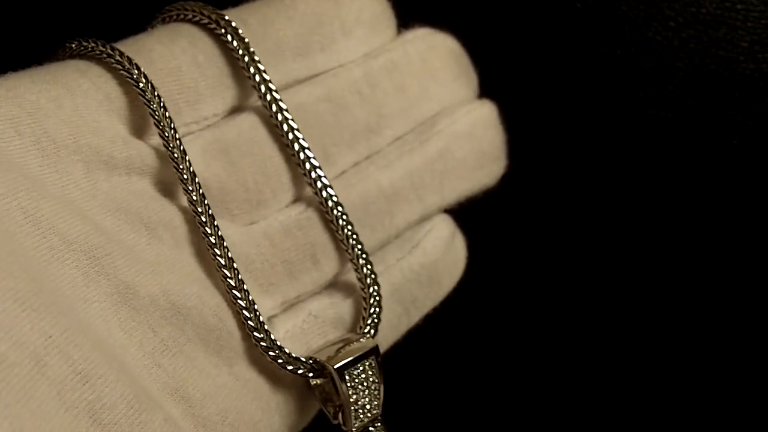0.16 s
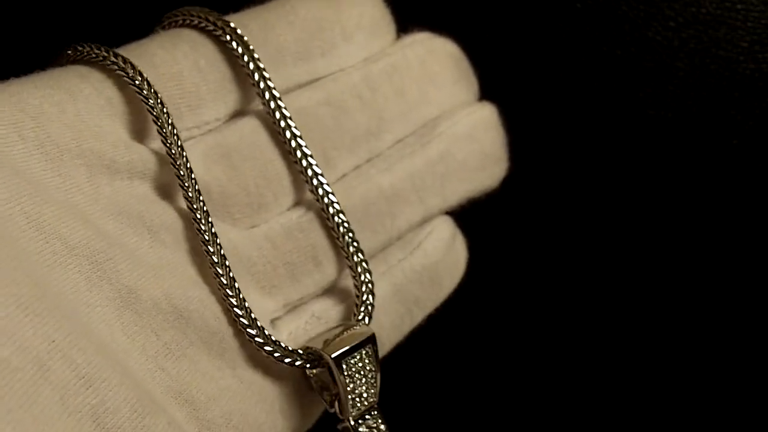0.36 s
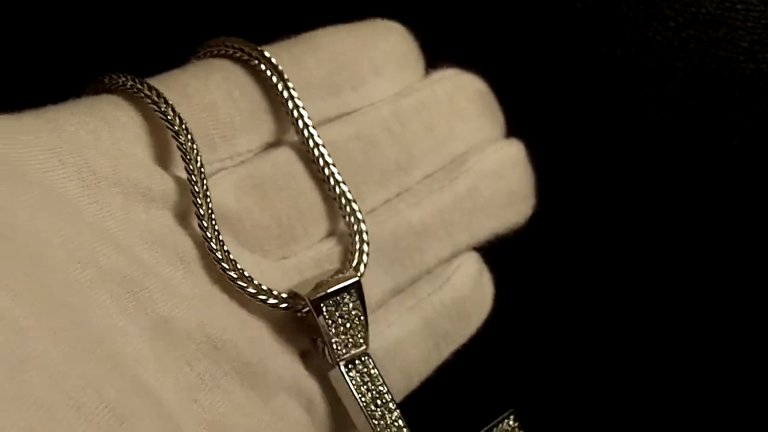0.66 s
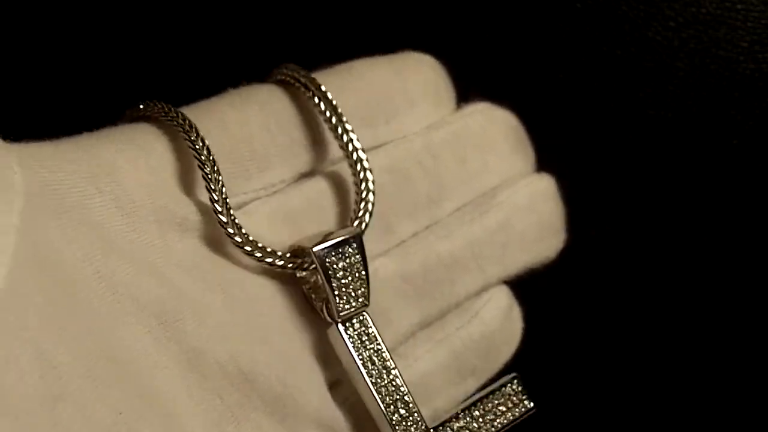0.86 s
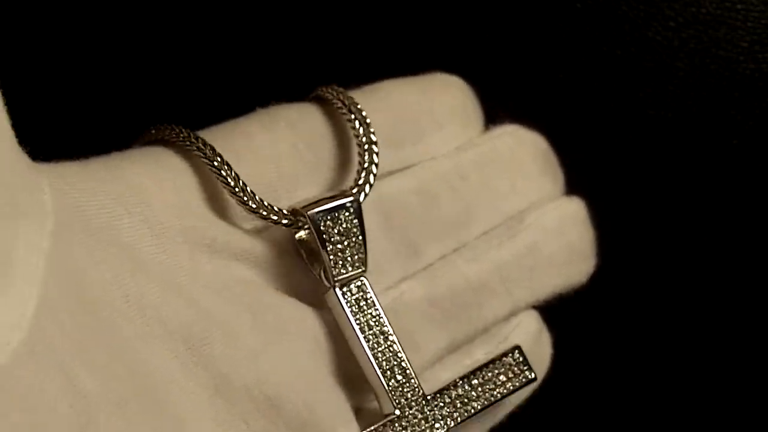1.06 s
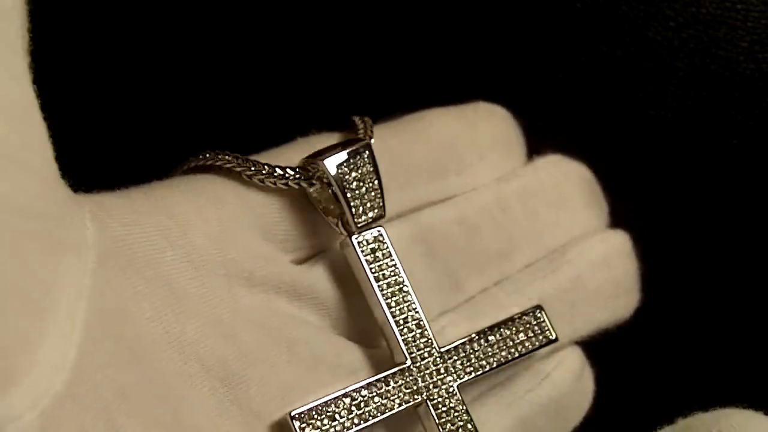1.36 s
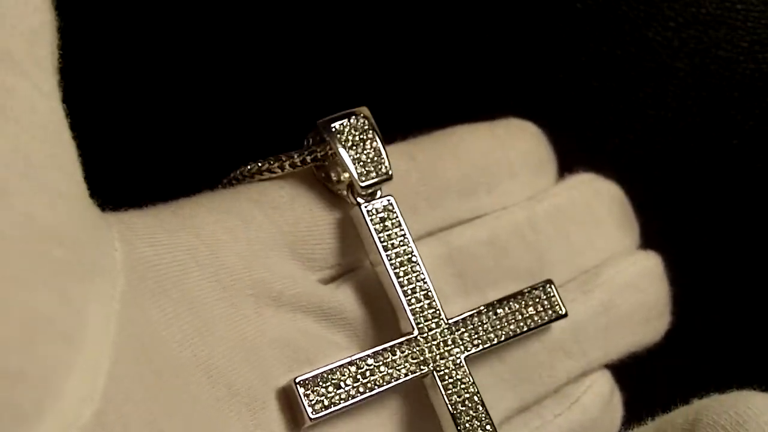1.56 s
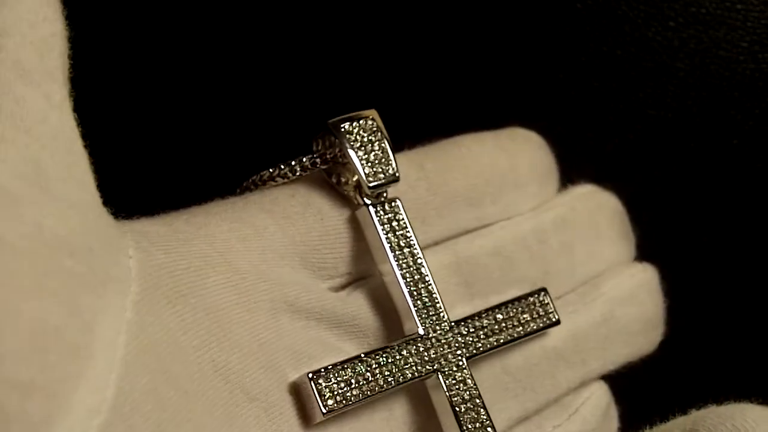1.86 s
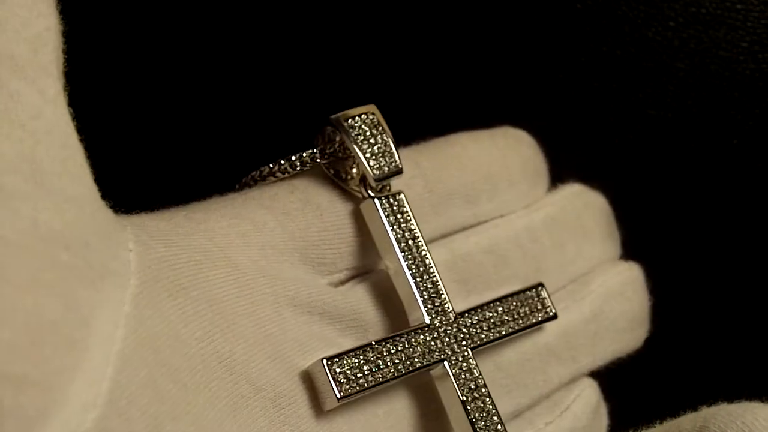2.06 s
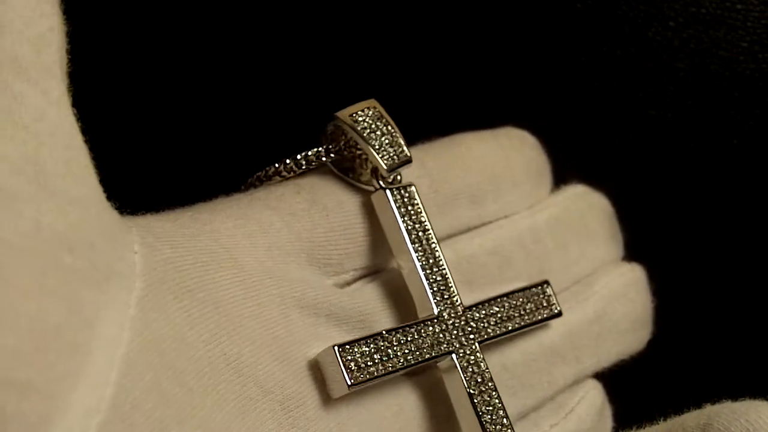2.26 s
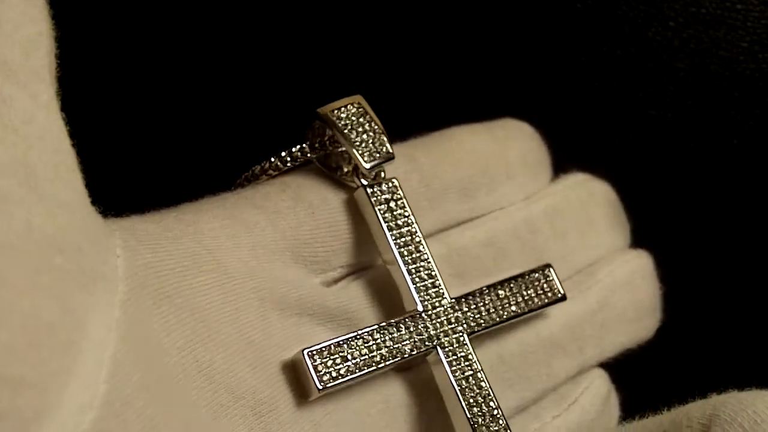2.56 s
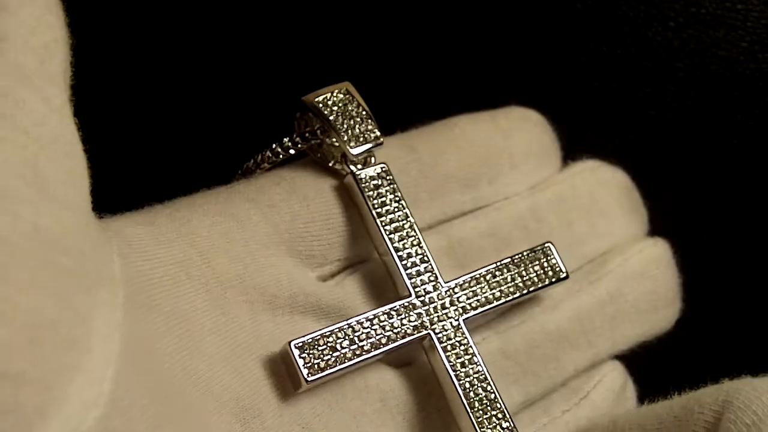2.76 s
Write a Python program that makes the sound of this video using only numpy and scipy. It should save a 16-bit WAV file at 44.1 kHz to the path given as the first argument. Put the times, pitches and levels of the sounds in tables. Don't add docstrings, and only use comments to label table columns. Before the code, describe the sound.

Small bright metal ticks and scraping of a necklace chain and cross, close up in a quiet room

```python
import sys
import numpy as np
from scipy import signal
from scipy.fft import rfft, irfft
from scipy.io import wavfile
from scipy.ndimage import uniform_filter1d

SR = 44100
rng = np.random.default_rng(int(sys.argv[2]) if len(sys.argv) > 2 else 0)


def log_audio(samples):
    frames = np.atleast_2d(samples).T
    limited = np.clip(frames, -1, 1)
    pcm = np.round(limited * 32767).astype(np.int16)
    wavfile.write(sys.argv[1], SR, pcm)


def level_to_linear(level):
    exponent = np.asarray(level, float) / 20
    return 10 ** exponent


N = 128331

# [f/Hz, level/dB, t60/s]
LINK_MODES = [(2277, -14, 0.021), (2540, -8.5, 0.0089), (3440, -46, 0.0056), (4330, -8, 0.018),
              (4760, -7, 0.0081), (5950, -12, 0.031), (6600, -7.5, 0.017), (6946, -6.5, 0.01),
              (7640, -5, 0.012), (8350, -20, .009), (8300, -11, 0.012), (8950, -17, 0.018),
              (9700, -36, 0.014), (9930, -19, 0.025)]
SPECK_FROM_HZ = 12900


def level(x, db):
    return x * level_to_linear(db) / np.sqrt(np.mean(x ** 2))


def noise(points):
    hz, db = np.array(points, float).T
    f = np.fft.rfftfreq(N, 1 / SR) + 1
    colour_db = np.interp(np.log(f), np.log(hz), db, left=-120, right=-120)
    return irfft(rfft(rng.standard_normal(N)) * level_to_linear(colour_db), N)


def walk(rate):
    k = int(SR / rate)
    steps = np.repeat(rng.standard_normal(N // k + 1), k)
    drift = uniform_filter1d(uniform_filter1d(steps, k), k)[:N]
    return drift / drift.std()


def band(x, hz, wide_hz):
    lo = max(np.hypot(hz, wide_hz / 2) - wide_hz / 2, 50)
    return signal.sosfilt(signal.butter(2, [lo, lo + wide_hz], "band", fs=SR, output="sos"), x)


def tone(hz, db):
    return level_to_linear(db) * np.sqrt(2) * np.sin(2 * np.pi * np.cumsum(hz) / SR)


def room_tone():
    # [f/Hz, density/dB]
    air = [(12, 0.5), (28, -10.5), (45, -17.5), (90, -21.5), (200, -31), (450, -40), (1000, -49),
           (3000, -63.5)]
    # [f/Hz, level/dB, wander/Hz]
    hum_lines = [(110.6, -59.5, 4.07), (121, -63, 2.94), (164.6, -64.5, 3.94), (221.6, -73, 3.83),
                 (239.8, -69.5, 3)]
    # [t/s, f/Hz, level/dB]
    lowest_line = [(0.03, 60, -44), (0.07, 58.2, -52.5), (0.61, 58.32, -47.5), (0.74, 60.7, -40),
                   (0.831, 60.9, -48.5), (1.06, 56.7, -41.5), (1.1, 61.5, -53), (1.28, 57.3, -42.5),
                   (1.62, 58.7, -43), (1.7, 58.7, -67), (1.93, 58.15, -37.5), (2.13, 58, -52.5),
                   (2.202, 59.3, -39.5), (2.36, 58.2, -49.5), (2.62, 58.35, -41), (2.74, 58.4, -62),
                   (2.76, 56.8, -42.5), (2.88, 58.2, -43)]
    at, lowest_hz, lowest_db = np.array(lowest_line).T
    t = np.arange(N) / SR
    hum = sum(tone(hz + wander * walk(5), db + 2.83 * walk(4.23)) for hz, db, wander in hum_lines)
    pitch = np.interp(t, at, lowest_hz) + 0.56 * walk(16)
    fan = tone(pitch, np.interp(t, at, lowest_db) + 0.5 * walk(9.2))
    rumble = level(noise(air) * level_to_linear(0.5 * walk(7.32)), -43)
    return rumble + hum + fan


def camera_hiss():
    # [f/Hz, density/dB]
    mid_hiss = [(700, 4.5), (2400, 2.5), (4200, -0.5), (6400, 1), (8100, -1), (12600, -3), (13200, -5.5),
                (15300, 2)]
    # [f/Hz, density/dB]
    side_hiss = [(20, 29.5), (300, -18.5), (900, 3), (3000, 0), (5500, -8.5), (8000, -2.5), (12700, -0.5),
                 (13300, -14)]
    return level(noise(mid_hiss), -71), level(noise(side_hiss), -78)


def specks():
    to_hz, per_s, length_ms, speck_db = 15050, 110, 6, -77.5
    size = int(length_ms * SR / 1000)
    out, t = np.zeros(N + 1024), np.arange(size) / SR
    crowd = walk(25)
    for at, pitch, keep in rng.random((int(2 * per_s * N / SR), 3)):
        if keep < 0.5 + 0.5 * crowd[int(at * N)]:
            hz = SPECK_FROM_HZ + pitch ** 1.4 * (to_hz - SPECK_FROM_HZ)
            out[int(at * N):][:size] += np.hanning(size) * np.sin(2 * np.pi * hz * t)
    return level_to_linear(speck_db) * out[:N]


def camera_buzz():
    # [f/Hz, level/dB]
    buzz_tones = [(2413, -82.5), (3062, -77.5), (4800, -93.5), (6125, -77.5), (6360, -88), (6575, -83),
                  (6800, -102), (10950, -90), (11600, -101)]
    frame_hz = 30 / 1.001
    starts_s, lasts_s, edge_s = 0.0262, 0.0158, 0.0006
    since = (np.arange(N) / SR - starts_s) % (1 / frame_hz)
    gate = np.clip(np.minimum(since, lasts_s - since) / edge_s, 0, 1)
    tones = sum(level_to_linear(db) * np.sqrt(2) * np.sin(2 * np.pi * hz * since) for hz, db in buzz_tones)
    rasp = level(band(rng.standard_normal(N), 7950, 1300), -83) * level_to_linear(2.5 * walk(11.7))
    return gate * (tones + rasp)


def taps():
    # [t/s, peak/dB, centre f/Hz, width/Hz, length/ms]
    knocks = [(.1755, -56.5, 5500, 6850, 2), (0.3361, -51.5, 3380, 2830, 2.8),
              (0.6586, -49, 1420, 1190, 1.7), (0.659, -47, 2210, 504, 8.5), (0.675, -60, 2420, 500, 3.3),
              (.9082, -47, 4500, 6000, .8), (1.3043, -48, 4830, 900, 6.9), (.1765, -64, 7544, 130, 1.0),
              (0.505, -57.5, 7530, 160, 2.0), (0.505, -65, 8440, 300, 2.0), (.5755, -54.5, 8170, 200, 2.3),
              (.66, -39.5, 8400, 600, 4.1), (0.6602, -33.5, 6050, 352, 3.8), (0.6587, -46, 5000, 700, 4.6),
              (.6775, -46, 8500, 500, 2.0), (.7465, -53, 6400, 150, 1.5), (.8, -51, 7600, 140, 2.3),
              (.835, -43, 6410, 110, 2.0), (.9135, -50.5, 10630, 200, 2.6), (0.9457, -55.5, 2350, 500, 3.3),
              (1.0748, -59, 7530, 120, 1.0), (1.3035, -45.5, 7140, 600, 4.0), (.669, -61, 13800, 300, 3.0),
              (.6592, -57, 13000, 3500, 6.6), (.659, -46, 4000, 5000, 1.2), (0.694, -46, 7500, 2200, 1.0),
              (.7192, -50, 7500, 2500, 1.0), (.7463, -44.5, 7550, 2200, 1.2), (.3358, -59, 2860, 1000, 1.4),
              (0.503, -53, 7000, 3000, .8), (1.0738, -52, 6600, 2500, 0.93), (1.2965, -60, 4330, 400, 1.8),
              (1.302, -53, 5500, 7000, 3.0), (.7465, -70, 14500, 900, 3.0), (.764, -68, 14850, 150, 3.0),
              (.786, -63, 14970, 130, 3.5)]
    out, t = np.zeros(N + 2048), np.arange(2048) / SR
    bursts = rng.standard_normal((len(knocks), 2048))
    for (at, db, hz, wide_hz, ms), burst in zip(knocks, bursts):
        tap = band(burst * np.exp(-(t * 1000 / ms) ** 2), hz, wide_hz)
        out[int(at * SR):][:2048] += level_to_linear(db) * tap / np.abs(tap).max()
    return out[:N]


def contacts(per_s, size):
    hit = rng.random(size) < per_s / SR
    spread_db = 2.5
    return hit * rng.choice([-1, 1], size) * level_to_linear(spread_db * rng.exponential(size=size))


def ring(x, hz, t60):
    rise_t60 = 0.003
    decay, rise = (np.exp(2j * np.pi * hz / SR - np.log(1000) / (max(s, 0.002) * SR))
                   for s in (t60, rise_t60))
    return signal.lfilter([1 - abs(rise)], np.convolve([1, -decay], [1, -rise]), x).imag


def chain(cross):
    # [t/s, peak/dB, low modes/dB, high modes/dB, top modes/dB]
    early = [
        (0.1758, -53.5, -16, -11, -20),
        (0.3361, -52, -12.5, -13, -22),
        (0.391, -55.5, -16, -7, -20),
        (0.5035, -51.5, -16, -8, -24),
        (0.5132, -51, -13.5, -10, -27),
        (0.5763, -54, -13, -15, -19),
        (.5904, -50.5, -13, -11, -15),
        (.62, -49.5, -6, -10, -18),
        (.6325, -46, -15, -11, -13),
        (0.653, -45, -15, -12, -27),
    ]
    pulls = [(0.6588, -28.5, -23, -8, -3), (0.6619, -30.5, -12.5, -9, -14),
             (0.6649, -30, -20.5, -16, -11), (0.6697, -44, -27, -14, -17),
             (0.6739, -38, -20.5, -15, -15), (0.6784, -40, -14, -12, -17),
             (0.6929, -43.5, -22, -10, -15), (0.7039, -44, -21, -12, -17),
             (0.7186, -45.5, -27, -16, -19), (0.7356, -55, -14, 0, -18), (0.7454, -39, -24, -15, -20),
             (0.7629, -40, -15, -12, -15), (0.7672, -40, -16, -14, -17),
             (0.7844, -36, -22.5, -19, -21), (0.7886, -36.5, -30, -17.5, -28),
                   (0.7944, -46.5, -22, -13, -21), (0.7999, -40, -24, -15, -28),
                   (0.8119, -48, -20, -14, -17), (0.8169, -40.5, -16, -15, -23),
                   (0.8309, -40, -18, -18, -17), (0.8349, -41.5, -18, -16, -12),
                   (0.8434, -45, -17, -16, -16), (0.8574, -43, -24, -8, -10), (0.8614, -37, -24, -27, -22),
                   (0.8674, -42, -23, -19, -27), (0.8724, -47, -17, -17, -21), (0.8824, -50, -10, -11, -10),
                   (0.9133, -38, -18.5, -12, -12), (0.9339, -53, -17, -13, -21),
                   (0.9434, -54, -15, -13, -17), (0.9472, -45.5, -22, -11, -17)]
    late = [
        (1.0745, -49.5, -20, -6, -18),
        (1.0924, -56, -11, -8, -20),
        (1.1513, -50, -19, -18, -30),
        (1.2955, -58, -24, -5, -22),
        (1.3029, -38.5, -16, -12, -1.5),
        (1.3064, -42.5, -17, -14, -6),
        (1.3104, -46.5, -20, -18, -7),
    ]
    out, t = np.zeros(N + 8192), np.arange(8192) / SR
    lag_s = 0.0006
    for at, db, low_db, high_db, top_db in early + pulls + late:
        scrape_ms = max(0.9 + 0.11 * (db + 54), 0.3)
        push = contacts(5000, size=8192) * np.clip(2 * (scrape_ms - t * 1000), 0, 1)
        push[0] = 3
        strength = np.sqrt(np.sum(push ** 2))
        zones_db = [low_db + 15, 0, high_db + 14, top_db + 20]
        tick = 0
        for modes, detune in ((cross, 0.001), (LINK_MODES, 0.015)):
            chance = rng.standard_normal((len(modes), 2))
            for (hz, mode_db, t60), (a, b) in zip(modes, chance):
                zone_db = zones_db[np.searchsorted([5300, 7000, 9500], hz)]
                at_mode = np.abs(np.sum(push[:512] * np.exp(-2j * np.pi * hz * t[:512])))
                even = np.clip(strength / at_mode, 0.5, 2.5)
                gain = even * level_to_linear(zone_db + mode_db + 2.0 * a)
                tick = tick + gain * ring(push, hz * (1 + detune * b), t60)
        out[int((at + lag_s) * SR):][:8192] += level_to_linear(db) * tick / np.abs(tick).max()
    return level_to_linear(-0.5) * out[:N]


def slide(cross):
    # [t/s, level/dB]
    strokes = [
        (.48, -66),
        (.57, -44),
        (.65, -33),
        (.70, -31),
        (.76, -33),
        (.88, -32.5),
        (0.959, -42),
        (1.05, -58.5),
    ]
    at, stroke_db = np.array(strokes).T
    moving_db = np.interp(np.arange(N) / SR, at, stroke_db, left=-90, right=-90)
    push = contacts(680, size=N) * level_to_linear(-34.5 + moving_db)
    return sum(level_to_linear(db) * ring(push, hz, t60) for hz, db, t60 in cross + LINK_MODES)


def thin_metal(x):
    low_hz, shelf_hz, shelf_db = 2050, 10810, -12
    f = np.fft.rfftfreq(N, 1 / SR) + 1
    top_db = shelf_db / (1 + np.exp((shelf_hz - f) / 120))
    return irfft(rfft(x) * level_to_linear(top_db) / np.sqrt(1 + (low_hz / f) ** 6), N)


def room_echo(x):
    t60 = 0.1
    t = np.arange(8192) / SR
    tails = rng.standard_normal((2, 8192)) * 1000. ** (-t / t60)
    return [signal.fftconvolve(x, h / np.sqrt(np.sum(h ** 2)))[:N] for h in tails]


def scene():
    cross_hz = [2480, 4307, 4872, 6370, 7544, 8301, 8511, 10492, 10665]
    # [level/dB, t60/s]
    cross_rings = [(-18, 0.024), (-19, 0.055), (-16.5, 0.02), (-3.5, 0.029), (-18.5, 0.11), (-17, 0.088),
                   (-19, 0.027), (-12, 0.014), (-13, 0.034)]
    cross = [(hz, *rest) for hz, rest in zip(cross_hz, cross_rings)]
    mid_hiss, side_hiss = camera_hiss()
    metal = taps() + thin_metal(chain(cross) + slide(cross))
    wet, side_wet = room_echo(metal)
    mid = room_tone() + mid_hiss + metal + level_to_linear(-19) * wet
    side = side_hiss + level_to_linear(-30) * side_wet
    return np.array([mid + side, mid - side])


def band_limit(x):
    return signal.sosfilt(signal.butter(12, 15180, fs=SR, output="sos"), x)


def record(dry):
    offset = [
        [.04617],
        [.03780],
    ]
    # [from t/s, to t/s]
    top_open = (.657, .91)
    f, t = np.fft.rfftfreq(N, 1 / SR), np.arange(N) / SR
    notch_hz, notch_wide_hz, notch_db = 5420, 800, -14
    dip = level_to_linear(notch_db / (1 + (2 * (f - notch_hz) / notch_wide_hz) ** 2))
    x = irfft(rfft(dry) * dip, N) + camera_buzz()
    top = irfft(rfft(x) * (f > SPECK_FROM_HZ), N)
    shut = uniform_filter1d(1. * ((t < top_open[0]) | (t > top_open[1])), size=400)
    x = x + shut * (specks() - (1 - level_to_linear(-30)) * top)
    top_cut = signal.ellip(8, 0.2, 60, 15000, fs=SR, output="sos")
    return band_limit(signal.sosfilt(top_cut, x) + np.array(offset))


dry = scene()
out = record(dry)
log_audio(out)
```